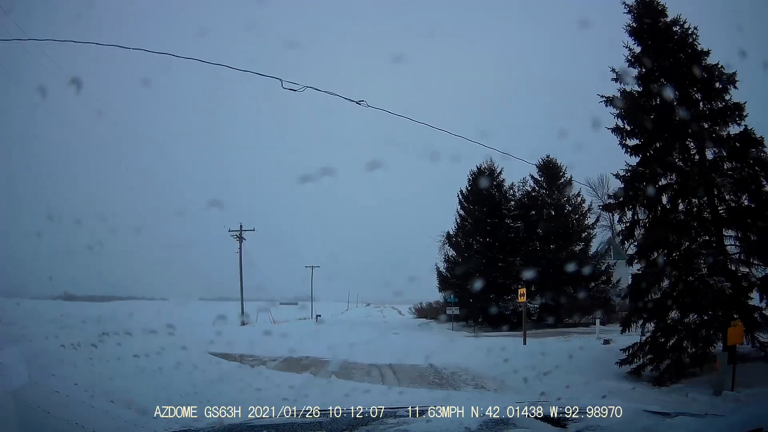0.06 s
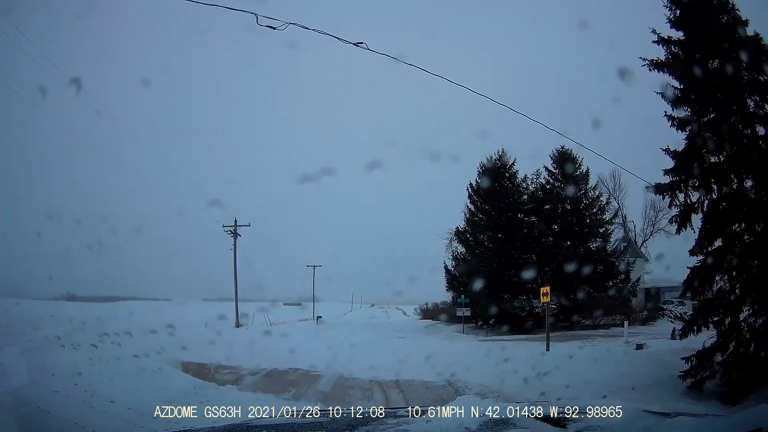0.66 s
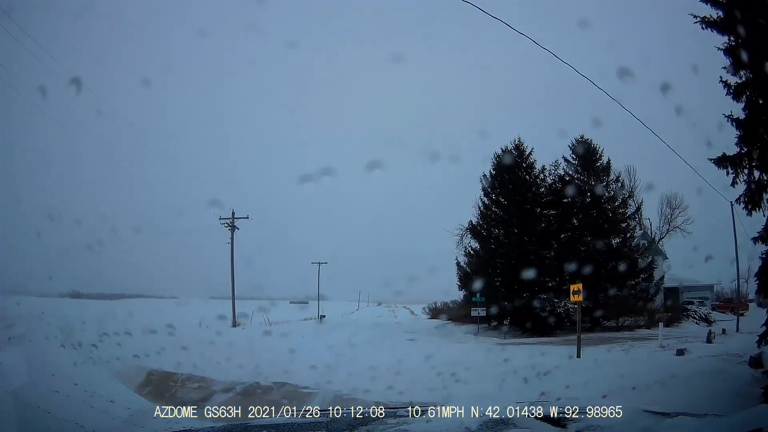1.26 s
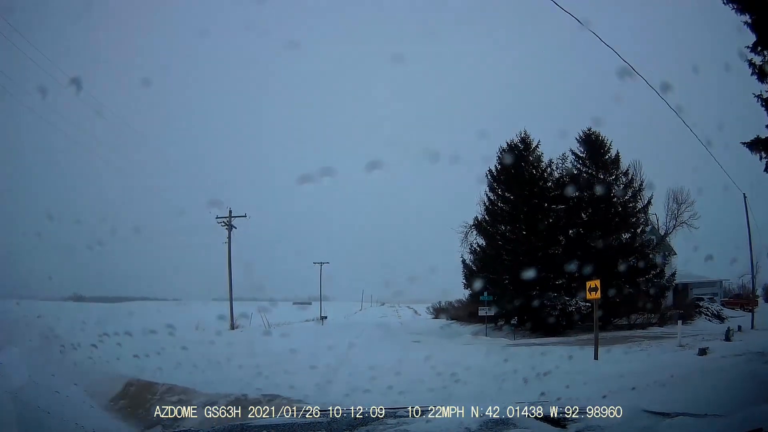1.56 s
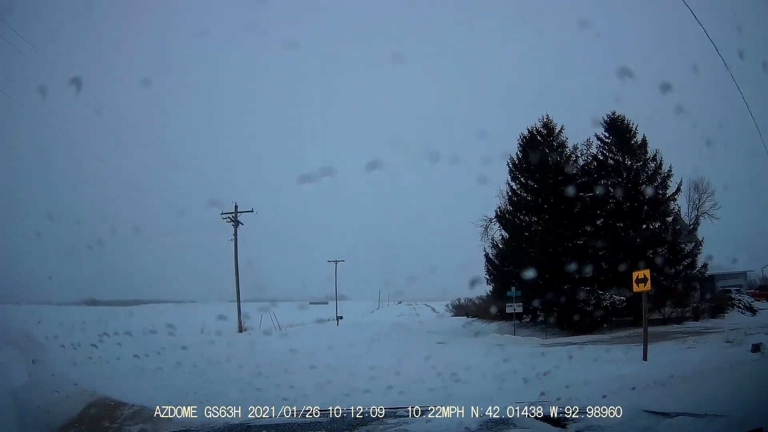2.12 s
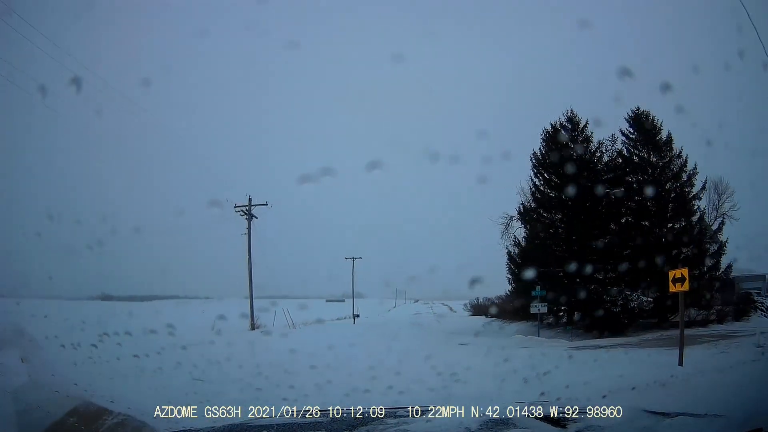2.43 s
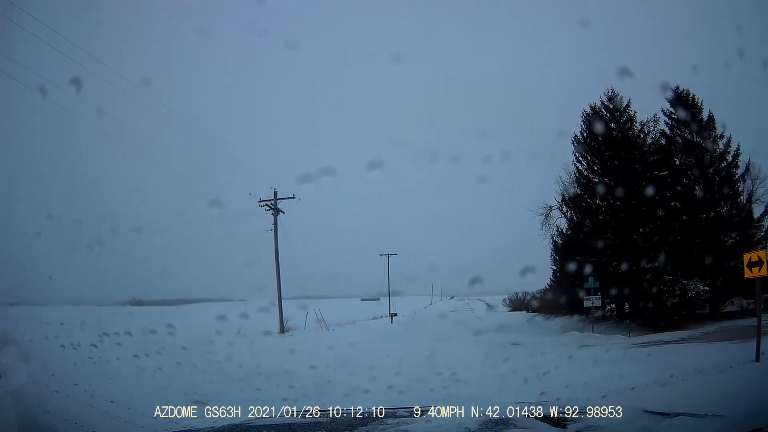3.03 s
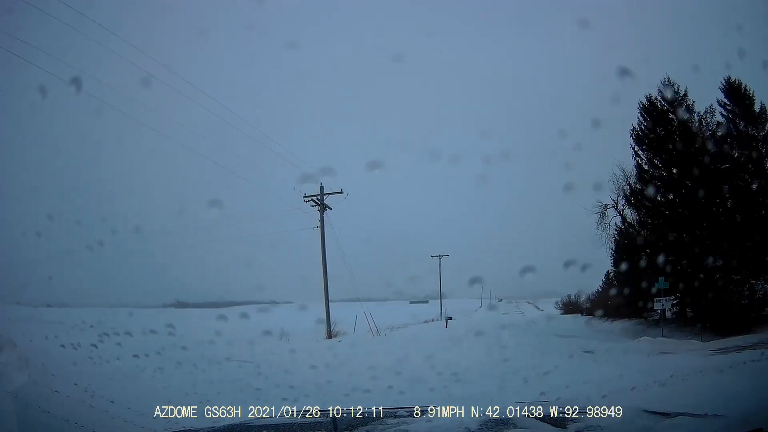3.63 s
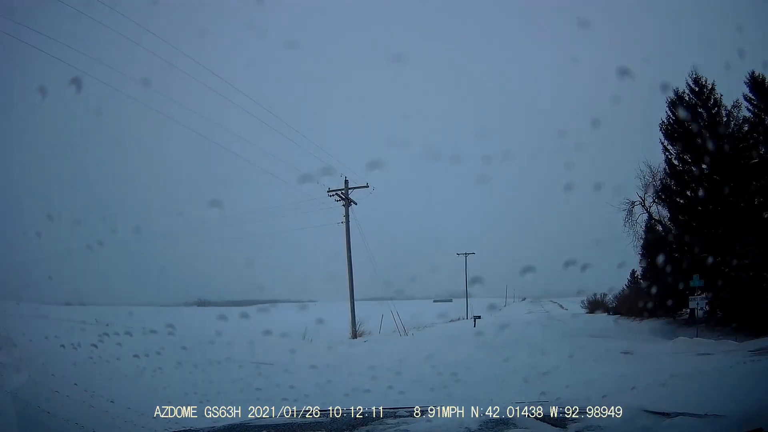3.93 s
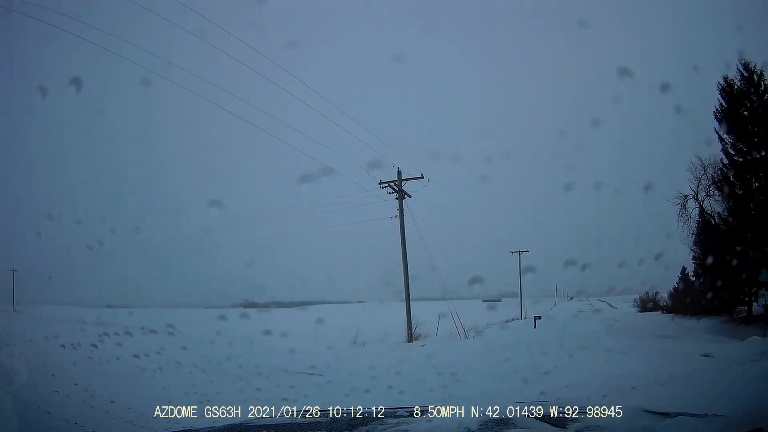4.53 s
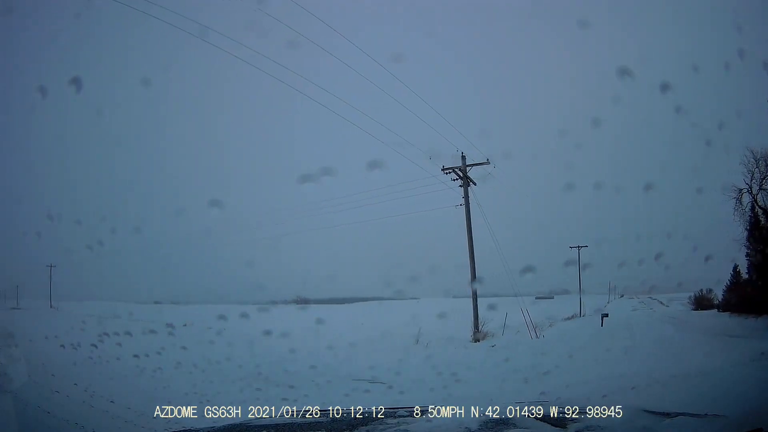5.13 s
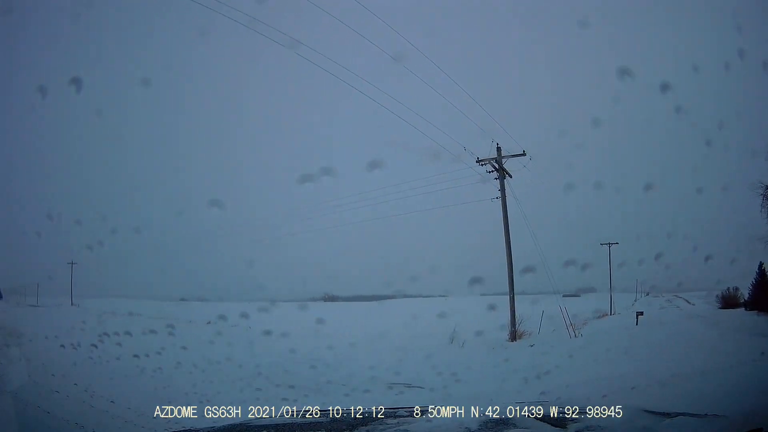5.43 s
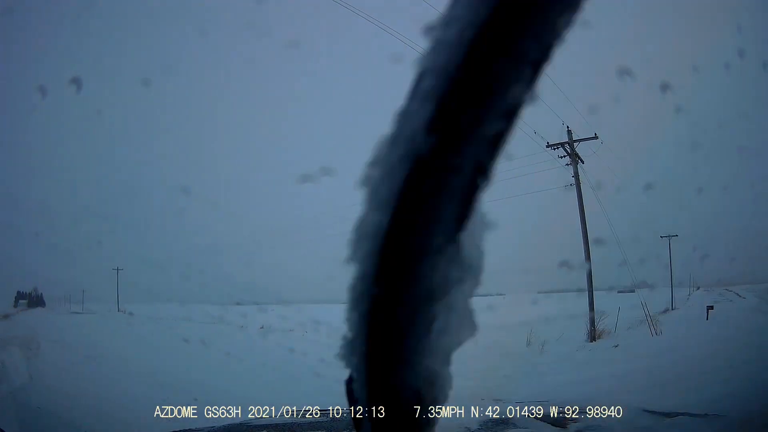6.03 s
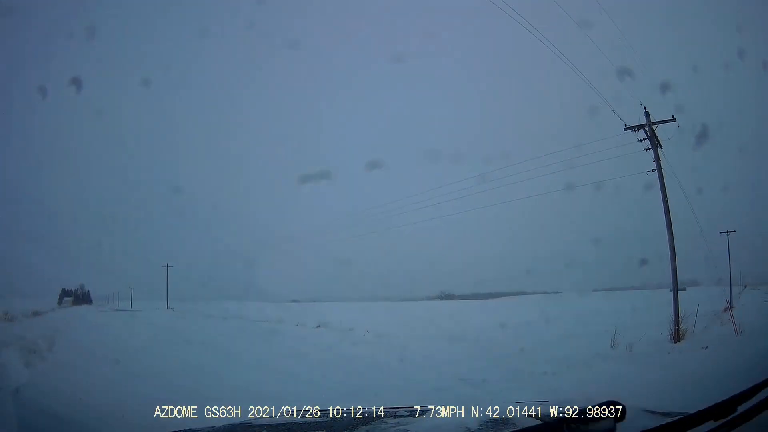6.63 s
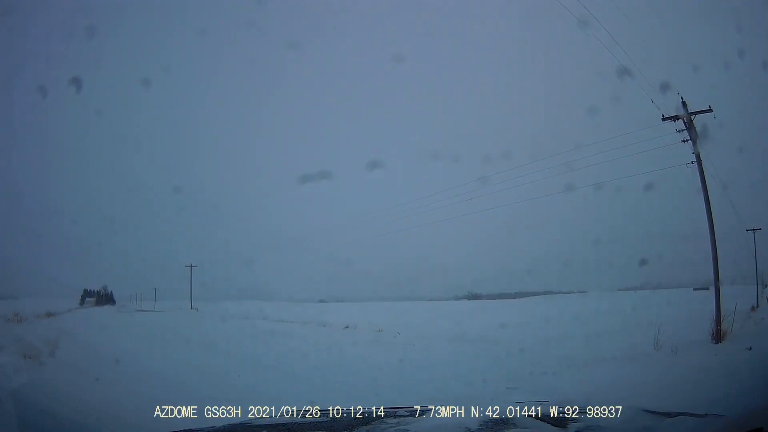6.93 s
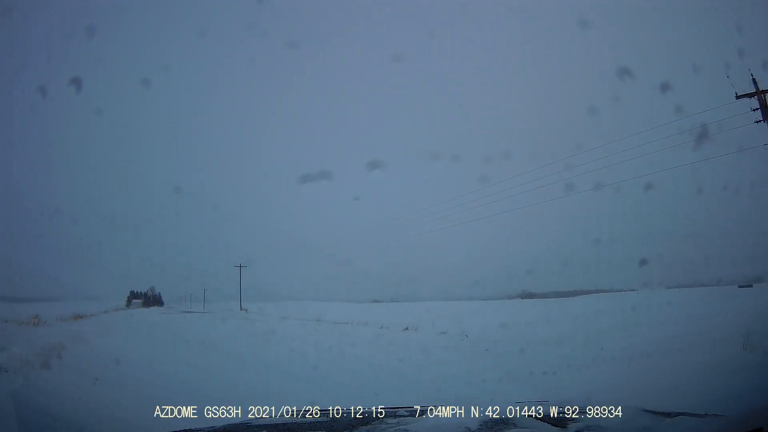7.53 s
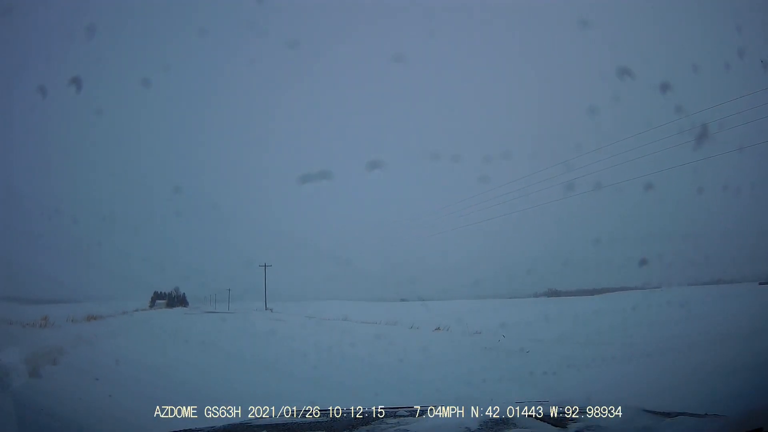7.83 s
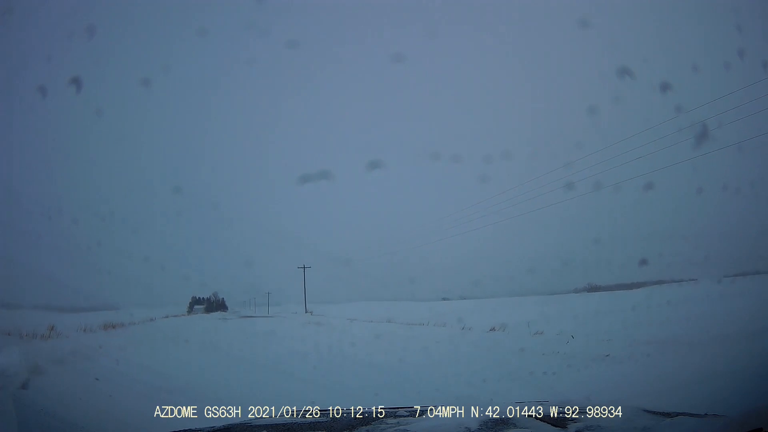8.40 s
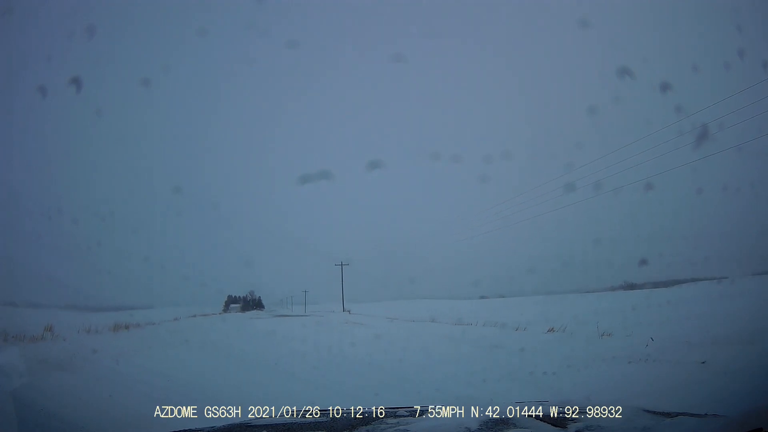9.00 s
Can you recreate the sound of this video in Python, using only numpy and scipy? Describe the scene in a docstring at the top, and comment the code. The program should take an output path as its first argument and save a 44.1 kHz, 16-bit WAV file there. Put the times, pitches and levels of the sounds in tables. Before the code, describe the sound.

A small microphone on a car's windshield picks up a low idling engine, tyre rumble and soft crunching of snow, with faint trim squeaks. As the engine picks up, its belt chirps faintly. Then the loudest event: an icy wiper grinds over the glass, gives a short rubbery squeal, thumps, scrapes back and parks with a knock. The engine hums on at a higher pitch as the car keeps rolling slowly.

```python
"""An ice-crusted wiper makes one sweep over a car's windshield: it scrapes, squeals as its rubber sticks
and slips, thumps at the turn, scrapes back and parks. We are inside, rolling slowly over packed snow.
The four-cylinder engine idles, then revs up in two steps, its belt chirping faintly. The tyres rumble
and crunch, and loose trim squeaks. A small camera on the glass hears it all over its own hiss."""
import sys
import numpy as np
from scipy import signal
from scipy.fft import rfft, irfft
from scipy.io import wavfile
from scipy.ndimage import uniform_filter1d

SR = 44100
rng = np.random.default_rng(int(sys.argv[2]) if len(sys.argv) > 2 else 0)


def master_out(mix):
    """Clip the mix to full scale and print it as 16-bit PCM to the path in sys.argv[1]."""
    frames = np.transpose(np.atleast_2d(mix))
    ceiling = np.clip(frames, -1, 1)
    pcm = np.round(ceiling * 32767).astype(np.int16)
    wavfile.write(sys.argv[1], SR, pcm)


N = 408366
TIME = np.arange(N) / SR

# pitches at which the windshield and camera mount ring: pitch_hz, width_hz, boost_db
GLASS_RINGS = [(440, 20, 11), (757, 44, 5), (813, 99, -1.5), (940, 100, -0.5), (1540, 110, 4.5),
               (1840, 240, -10), (2120, 390, 3.5), (2510, 200, -2.5), (3370, 390, 7.5), (3880, 260, -7.5),
               (4400, 570, 4.5), (5190, 300, -24)]
# tone colour (how strong the lows and highs are) of the wiper's frame: pitch_hz, level_db
FRAME_COLOUR = [(150, 4), (400, 1), (1000, -5), (1800, -9), (2600, -7.5), (3600, -6), (4100, -18),
                (4600, -8.5), (5400, -31), (6600, -16.5), (8200, -31), (9500, -41), (15000, -52)]
# pitches at which that frame rings: pitch_hz, width_hz, boost_db
FRAME_RINGS = [(2545, 350, 11.5), (1010, 170, 7.5), (3600, 200, 2.5)]
# how fast the engine runs: time_s, firings_per_s
ENGINE_SPEED = [(0, 48), (3.55, 48), (3.9, 53), (4.4, 70), (4.65, 68), (5.75, 67), (6.25, 83.5), (7.2, 87),
                (8.2, 92), (9.26, 93.3)]
# what the cabin hears at each speed: firings_per_s, firing_tone_db, octave_db, belt_chirp_db
ENGINE_LEVELS = [(48.4, -65, -69, -83), (55, -66, -55.5, -75), (68.7, -55, -55.5, -70),
                 (83.8, -50.5, -56.5, -79), (86.1, -44.5, -53.5, -81), (94.7, -48.5, -65.5, -96)]
# pitches at which the cabin rings: pitch_hz, width_hz, boost_db
CABIN_RINGS = [(116, 35, 3.5), (374.5, 63, 4.5), (596, 48, 1), (998, 43, 3), (1228, 140, 4), (1500, 240, 4)]


def wiper_scrape(release_s=0.019):
    """Ice on the blade grinds and fizzes over the glass, grains crackle in the frame, the arm thuds."""
    # the blade catches on ice; change_db builds up while it is held, and the last two add to level_db:
    # start_s, swell_s, held_s, level_db, change_db, thud_db, fizz_db
    catches = [(5.505, 0.065, 0.016, -49, 6, 2, -15.5), (5.598, 0.032, 0.023, -42.5, -1.5, -1, -13.5),
               (5.672, 0.01, 0.029, -49, 2, -4, -19), (5.749, 0.0054, 0.023, -44.5, -5.5, 0, -24),
               (6.05, 0.047, .008, -45.5, 5, -2, -17), (6.105, 0.0047, 0.046, -34.5, -4.5, -4, -16.5),
               (6.175, 0.0037, 0.057, -42, -4, -1.5, -15), (6.338, 0.046, 0.026, -37, -1, -1, -17.5),
               (6.42, 0.012, 0.041, -40.5, 2.5, 3, -6.5), (6.72, 0.023, .05, -63, -6, -8, -8),
               (6.835, 0.04, 0.029, -51, 4, -1.5, -17.5), (6.955, 0.028, 0.032, -53.5, -6, 9, -25)]
    # dull thud of the shuddering arm: pitch_hz, level_db
    thud_colour = [(60, -37), (130, 12), (200, 13), (330, 9.5), (450, -7), (700, -12), (1500, -35)]
    # bright fizz of the ice: pitch_hz, level_db
    fizz_colour = [(3000, -2.5), (5000, -1.5), (6300, -6), (8200, -12), (9200, -12.5), (10500, -18),
                   (12500, -19), (15500, -30)]
    light_drag = (5.51, release_s, 1.5, -69.5, 0, -3, -10.5)  # lasts the whole sweep; columns as above
    power = np.zeros((3, N))  # one row each for rasp, thud and fizz
    for start_s, swell_s, held_s, level_db, change_db, thud_db, fizz_db in [light_drag, *catches]:
        t = TIME[:round((swell_s + held_s + 10 * release_s) * SR)]
        rise = np.minimum(t / swell_s, 1)
        hold = gain_of(change_db * np.clip((t - swell_s) / held_s, 0, 1))
        release = np.exp(-np.maximum(t - swell_s - held_s, 0) / release_s)
        for layer, extra_db in zip(power, (0, thud_db, fizz_db)):
            add(layer, start_s, (rise * hold * release * gain_of(level_db + extra_db)) ** 2)
    judder = evened(gain_of(2.9 * wander(220) + 1.5 * wander(45)))  # the blade grips and lets go
    crackle = colour(grains(per_s=300, spread_db=3), FRAME_COLOUR, FRAME_RINGS)
    rasp = judder * ice_grinding() + gain_of(-7) * crackle
    thud = gain_of(-2.5) * colour(judder * noise(), thud_colour, GLASS_RINGS)
    fizz = gain_of(2) * colour(judder * grains(per_s=2100, spread_db=3), fizz_colour)
    return (np.sqrt(power) * [rasp, thud, fizz]).sum(0)


def ice_grinding(ridges=6):
    """Ridges of ice grip unevenly; each makes the glass ring at its own random pitches."""
    # rasp of ice on glass: pitch_hz, level_db
    rasp_colour = [(200, -13), (400, 1), (750, -4), (1100, -2.5), (1500, -4.5), (2200, -7.5), (3300, -13),
                   (4500, -15), (5500, -17.5), (7000, -49), (10000, -59)]
    out = np.zeros(N)
    for _ in range(ridges):
        pitches_hz = np.exp(rng.uniform(np.log(600), np.log(5000), size=4))
        own_rings = [(hz, 60 + .04 * hz, 6) for hz in pitches_hz]
        grip = gain_of(6 * np.tanh(wander(45)))
        out += grip * colour(grains(per_s=1400, spread_db=2.8), rasp_colour, GLASS_RINGS + own_rings)
    return evened(out)


def wiper_knocks():
    """The wiper's arm thumps, its frame clacks and rings, and ice breaks off with short bright cracks."""
    # the arm hits the glass: start_s, peak_db
    thumps = [(5.502, -39), (6.109, -28.5), (6.127, -25), (6.176, -23.5), (6.22, -30.5), (6.52, -46),
              (6.978, -38.5), (6.999, -35)]
    # deep sound of a thump: pitch_hz, level_db
    thump_colour = [(70, -26), (170, 4.5), (320, 5), (520, -5), (700, -1), (1100, -10), (1500, -25),
                    (2000, -43), (5000, -39), (12000, -77)]
    # the frame hits the glass: start_s, peak_db
    clacks = [(5.623, -32), (5.631, -28), (5.731, -27.5), (5.827, -36), (6.336, -38), (6.541, -41.5),
              (6.79, -42.5), (6.821, -34)]
    # ice breaks off: start_s, peak_db, fade_s, treble_db
    cracks = [(6.109, -29, .02, -20), (6.122, -26.5, 0.031, -24), (6.278, -54, .008, -15),
              (6.436, -34, .008, 6), (6.452, -29, .008, 9), (6.474, -26, .009, 3), (6.483, -37, 0.018, 6),
              (6.903, -50, .008, 7), (6.989, -41.5, 0.012, -5)]
    # bright sound of breaking ice: pitch_hz, level_db
    ice_colour = [(500, -15), (2500, 17.5), (4500, 14.5), (6500, 14.5), (9200, -2), (10500, -31),
                  (12500, -2), (15500, -23)]
    out = np.zeros(N)
    for start_s, peak_db in thumps:
        thump = burst(thump_colour, GLASS_RINGS, fade_s=0.094, rise_s=0.0024)
        add(out, start_s, gain_of(peak_db) * thump)
    for start_s, peak_db in clacks:
        clack = burst(FRAME_COLOUR, FRAME_RINGS, fade_s=0.033, rise_s=0.0024)
        add(out, start_s, gain_of(peak_db) * clack)
    for start_s, peak_db, fade_s, treble_db in cracks:
        crack = burst(ice_colour, [(12900, 3400, treble_db)], fade_s, rise_s=0.00043)
        add(out, start_s, gain_of(peak_db) * crack)
    return out


def wiper_squeal():
    """The rubber sticks and slips a few hundred times a second; every slip sets its lip buzzing."""
    # course of the squeal: time_s, slips_per_s, level_db
    course = [(5.87, 400, -62), (5.888, 382, -46), (5.925, 362, -45), (5.97, 375, -47), (6.015, 352, -47.5),
              (6.04, 362, -51), (6.06, 385, -50), (6.095, 365, -53)]
    # tones in the squeal: multiple_of_slip_rate, level_db
    overtones = [(1, 1.5), (2, -7), (3, -8.5), (4, -13)]
    # ring of the rubber lip: pitch_hz, level_db
    lip_colour = [(500, 2.5), (1500, -24), (1800, -4), (2400, -4.5), (3500, -2), (4400, 1.5), (5200, -4.5),
                  (6000, -1), (6800, -13), (9000, -18), (11000, -29), (15500, -30)]
    slip_hz, level_db = follow(course)
    sounding = (TIME > course[0][0]) * (TIME < course[-1][0])
    level = abs(uniform_filter1d(gain_of(level_db) * sounding, size=200))  # softens the start and end
    cycles = np.cumsum(slip_hz * (1 + .05 * wander(200))) / SR
    tones = sum(np.sqrt(2) * gain_of(db + wander(60)) * np.cos(2 * np.pi * (k * cycles + rng.random()))
                for k, db in overtones)
    slips = np.diff(np.floor(cycles + 0.047 * wander(400)), prepend=0)  # one click a cycle
    slips *= gain_of(1.1 * wander(300))
    rub = noise() * (0.18 + np.exp(-(cycles % 1) / 0.21))
    buzz = colour(.5 * evened(slips) + evened(rub), lip_colour, rings=[(4450, 470, 5.4)])
    pressure = (level / level.max()) ** 1.03  # the buzz needs a hard-pressed lip
    return level * (tones + gain_of(-1) * pressure * buzz)


def engine(idle_hz=48, strongest_multiple=1.36):
    """The firing cylinders hum, and a clatter pulses with each firing; both follow the engine speed."""
    # unequal cylinders add extra tones: multiple_of_firing_rate
    extra_tones = [.75, 1.5, 1.75, 2.25, 2.5, 3, 3.75, 4, 4.25, 5, 6, 6.5, 7, 10.25, 13.75]
    # engine noise coming through the cabin's front wall: pitch_hz, level_db
    clatter_colour = [(88, -32), (150, -2), (184, 3.5), (254, -17), (373, -8.5), (438, -12.5), (613, -15.5),
                      (680, -14), (953, -23.5), (1060, -25.5), (5000, -43), (6500, -88), (11000, -120)]
    firing_hz, = follow(ENGINE_SPEED)
    firing_db, octave_db, _ = follow(ENGINE_LEVELS, firing_hz)
    drone_db = 13 * np.clip((1.72 - TIME) / 0.65, 0, 1)  # at first the idling engine labours
    effort_db = -72 + 0.1791 * (firing_hz - idle_hz)
    firings = np.cumsum(firing_hz * (1 + 0.00349 * wander(5.33))) / SR

    def tone(multiple, db, waver_db):
        level = np.sqrt(2) * gain_of(db + waver_db * wander(10))
        return level * np.sin(2 * np.pi * (multiple * firings + rng.random()))

    hum = tone(0.99, firing_db + drone_db, waver_db=0.94) + tone(2, octave_db, waver_db=1)
    hum += tone(1.25, effort_db + 10.5, waver_db=1.5)  # a part driven by the belt
    for multiple in extra_tones:
        octaves_away = abs(np.log2(multiple / strongest_multiple))
        hum += tone(multiple, effort_db - 1 - 5.5 * octaves_away, waver_db=2)
    pulse = 1 + .5 * np.cos(2 * np.pi * firings)
    clatter = colour(noise() * pulse, clatter_colour, CABIN_RINGS)
    return hum + gain_of(effort_db + 5.5) * clatter


def road_rumble(bump_half_s=0.21, boom_half_s=0.24, boom_hz=95):
    """The body sways on its springs, the tyres roar, and the cabin air booms at its lowest note."""
    # ruts rock the body: time_s, level_db
    ruts = [(.15, -52.5), (0.452, -55.5), (1.14, -51), (2.05, -53.5)]
    # very deep sound of the swaying body: pitch_hz, level_db
    sway_colour = [(8, -8.5), (15, -3.5), (27, 20), (38, 6), (60, 8.5), (100, -53)]
    # the tyres roar more in deeper snow: time_s, level_db
    roar_levels = [(0, -58), (2.7, -58.5), (4.5, -56), (7.2, -55), (9.26, -54.5)]
    # low roar of the tyres: pitch_hz, level_db
    roar_colour = [(32, -15.5), (55, -5), (76, -22), (117, -4), (145, -16), (183, -15.5), (207, -13),
                   (382, -18.5), (433, -24), (754, -29), (4000, -53), (5200, -82.5), (8800, -120)]
    # packed ridges of snow make the air boom: time_s, level_db
    ridges = [(3.55, -54.5), (4.1, -47), (5.1, -47.5)]
    sway = swells([(s, bump_half_s, db) for s, db in ruts], steady_db=-57.5) * colour(noise(), sway_colour)
    roar_db = follow(roar_levels)[0] + 0.48 * wander(4.4)
    roar = gain_of(roar_db) * colour(noise(), roar_colour, CABIN_RINGS)
    boom_cycles = np.cumsum(boom_hz + 7 * wander(12.4)) / SR
    boom_level = swells([(s, boom_half_s, db) for s, db in ridges], steady_db=-61)
    boom = boom_level * gain_of(2.5 * wander(17)) * np.sin(2 * np.pi * boom_cycles)
    return sway + roar + boom


def snow_crunch():
    """Snow crunches finely under the tyres, and lumps break against the underside of the car."""
    # patches of crusted snow: time_s, half_length_s, level_db
    patches = [(1.36, 0.085, -72.5), (2.057, 0.19, -77), (3.023, .24, -76)]
    # crisp sound of the crunch: pitch_hz, level_db
    crunch_colour = [(200, -31), (500, -22), (1300, 7), (2000, -0.5), (3300, 2), (4600, -3), (7000, -10),
                     (10000, -14), (15500, -19)]
    # bigger lumps hit the car: start_s, peak_db, crispness_db
    lumps = [(0.512, -56, -18), (1.114, -55.5, 6), (1.175, -46.5, 7), (1.335, -55, 1), (1.392, -51, -16),
             (2.043, -50, -4), (2.146, -60.5, 34), (2.182, -52, -3), (2.434, -50, 2), (3.284, -53, 8),
             (2.854, -52.5, -14), (4.931, -53, 4), (5.212, -52, 1), (7.076, -49.5, -4), (7.178, -50, -10),
             (7.228, -47, 2)]
    # dull knock of a lump: pitch_hz, level_db
    lump_colour = [(80, 1), (350, 7), (1000, 5.5), (1600, -4), (2200, -13), (3500, -17), (6000, -38),
                   (15000, -39)]
    crunch = colour(grains(per_s=1600, spread_db=0) * gain_of(2 * wander(25)), crunch_colour)
    small_lumps = colour(grains(per_s=70, spread_db=1.5), lump_colour)
    knocks = evened(cabin_echo(small_lumps, fade_s=.05, echo_db=1.5))
    out = swells(patches, steady_db=-87) * (crunch + gain_of(3) * knocks)
    for start_s, peak_db, crispness_db in lumps:
        knock = burst(lump_colour, [(3380, 4000, crispness_db)], fade_s=0.083, rise_s=0.00056)
        add(out, start_s, gain_of(peak_db) * knock)
    return out


def belt_chirp(chirp_hz=1272, firings_per_lap=8, width_laps=0.12):
    """A patch of the belt, worn smooth, chirps once a lap, most at middling engine speeds."""
    firing_hz, = follow(ENGINE_SPEED)
    *_, chirp_db = follow(ENGINE_LEVELS, firing_hz)
    laps = np.cumsum(firing_hz) / SR / firings_per_lap
    laps -= np.interp(4.765, TIME, laps)  # one chirp peaks at 4.765 s
    on_pulley = np.exp(-(((laps + .5) % 1 - .5) / width_laps) ** 2)
    tone = np.sin(2 * np.pi * np.cumsum(chirp_hz + 19 * wander(63.5)) / SR)
    return np.sqrt(2) * gain_of(chirp_db + 0.53 * wander(7.5)) * on_pulley * tone


def trim_squeaks():
    """Loose plastic trim rubs as the body twists, giving thin, unsteady squeaks."""
    # the squeaks: start_s, length_s, pitch_hz, relative_db
    squeaks = [(1.813, .025, 4330, -76), (1.99, 0.08, 3550, -81), (2.238, .09, 3440, -80),
               (2.274, 0.12, 2760, -81)]
    out = np.zeros(N)
    for start_s, length_s, pitch_hz, relative_db in squeaks:
        swell = signal.windows.hann(int(length_s * SR))
        cycles = np.cumsum(pitch_hz * (1 + 0.015 * wander(250)[:len(swell)])) / SR
        add(out, start_s, gain_of(relative_db + 0.5) * swell * np.sin(2 * np.pi * cycles))
    return out


def cabin_echo(x, fade_s, echo_db):
    """Adds the short, dense echoes of a padded cabin; they fall by 60 dB in fade_s."""
    t = TIME[:SR // 5]
    echoes = rng.standard_normal(len(t)) * (rng.random(len(t)) < 2000 / SR)
    echoes *= (t > .002) * gain_of(-60 * t / fade_s)
    return x + gain_of(echo_db) * signal.oaconvolve(x, echoes / np.linalg.norm(echoes))[:N]


def burst(points, rings, fade_s, rise_s):
    """A brief cluster of tiny hits makes an object ring; the peak is about 1."""
    t = TIME[:SR // 8]
    shape = gain_of(-60 * t / fade_s) * (1 - np.exp(-t / rise_s))
    ring = colour(rng.choice([-1, 1], len(t)) * shape, points, rings)
    return ring * shape.std() / shape.max() / 2


def grains(per_s, spread_db):
    """Random tiny cracks; spread_db makes a few of them larger than the rest."""
    size = gain_of(spread_db * np.minimum(rng.exponential(1, N), 4))
    return evened(size * rng.choice([-1, 1], N) * (rng.random(N) < per_s / SR))


def colour(x, points, rings=(), size=8192):
    """Filters x with a broad tone colour plus ringing pitches; the result has strength 1."""
    hz = abs(np.fft.fftfreq(size, 1 / SR))
    pitch_hz, level_db = np.transpose(points)
    db = np.interp(np.log(hz + 1), np.log(pitch_hz + 1), level_db)
    for centre_hz, width_hz, boost_db in rings:
        db = db + boost_db / (1 + (2 * (hz - centre_hz) / width_hz) ** 2)
    spectrum = np.exp(np.conj(signal.hilbert(np.log(gain_of(db)))))  # rings after a hit, never before
    response = np.fft.ifft(spectrum).real
    return evened(signal.oaconvolve(x, response[:size // 2])[:len(x)])


def swells(rows, steady_db):
    """A steady gain with bell-shaped swells on top: time_s, half_length_s, level_db."""
    power = sum(gain_of(db) ** 2 * np.exp(-((TIME - s) / half_s) ** 2) for s, half_s, db in rows)
    return np.sqrt(gain_of(steady_db) ** 2 + power)


def wander(rate_hz):
    """A smooth random wobble of strength 1, up to about the given rate."""
    hz = np.fft.rfftfreq(N, 1 / SR)
    return evened(irfft(rfft(noise()) * np.exp(-(hz / rate_hz) ** 2), N))


def noise():
    """White noise of strength 1."""
    return rng.standard_normal(N)


def evened(x):
    """Scales x to an average strength (rms) of 1."""
    return x / np.sqrt(np.mean(x ** 2) + 1e-20)


def gain_of(db):
    """Turns decibels into a factor."""
    return 10 ** (np.asarray(db) / 20)


def follow(rows, at=TIME):
    """Joins a table's rows by straight lines; one curve for each column after the first."""
    positions, *columns = np.transpose(rows)
    return [np.interp(at, positions, column) for column in columns]


def add(mix, start_s, sound):
    """Mixes a sound in at start_s."""
    part = mix[round(start_s * SR):][:len(sound)]
    part += sound[:len(part)]


def scene():
    """The wiper, echoing in the cabin, over the sounds of the moving car; one channel."""
    wiper = cabin_echo(wiper_scrape() + wiper_knocks() + wiper_squeal(), fade_s=0.062, echo_db=-9)
    return (wiper + engine() + belt_chirp() + road_rumble() + snow_crunch() + trim_squeaks())[None]


def record(dry, top_hz=15750):
    """The microphone adds its hiss, and the treble above top_hz is cut off."""
    # the microphone's own hiss: pitch_hz, level_db
    hiss_colour = [(100, -7), (1500, -10.5), (3000, -4), (3900, -15.5), (4600, -3), (5300, -8), (6050, 1.5),
                   (7300, -11.5), (10000, -15.5), (13000, -17.5), (15000, -15.5)]
    hiss = gain_of(-79) * colour(noise(), hiss_colour)
    treble_cut = signal.firwin(1023, top_hz, window=("kaiser", 9), fs=SR)
    return signal.oaconvolve(dry + hiss, treble_cut[None], "same")


dry = scene()
out = record(dry)
master_out(out)
```